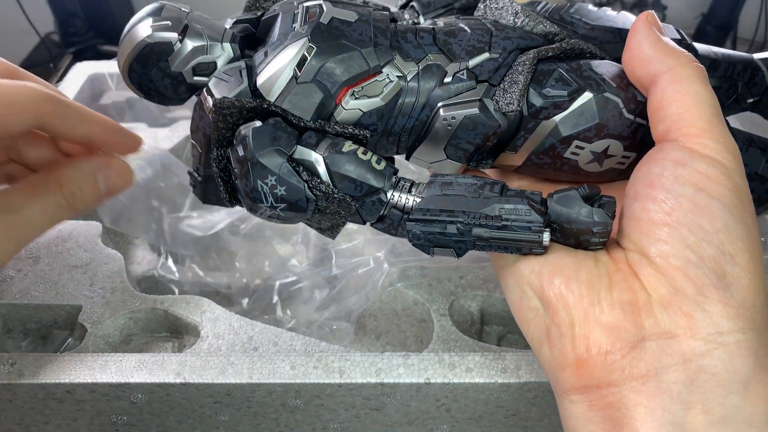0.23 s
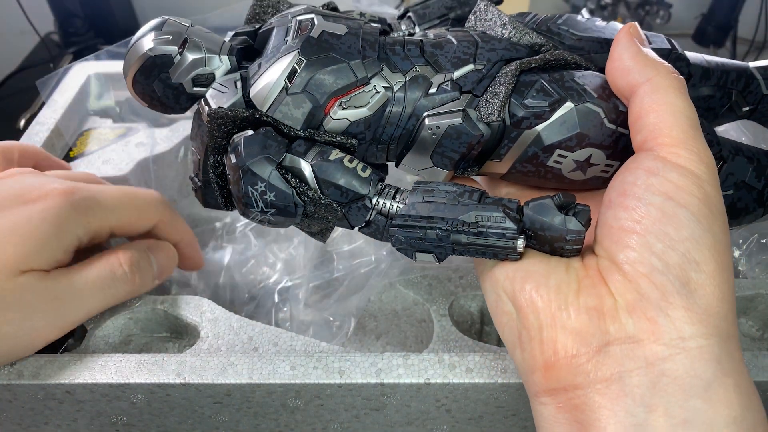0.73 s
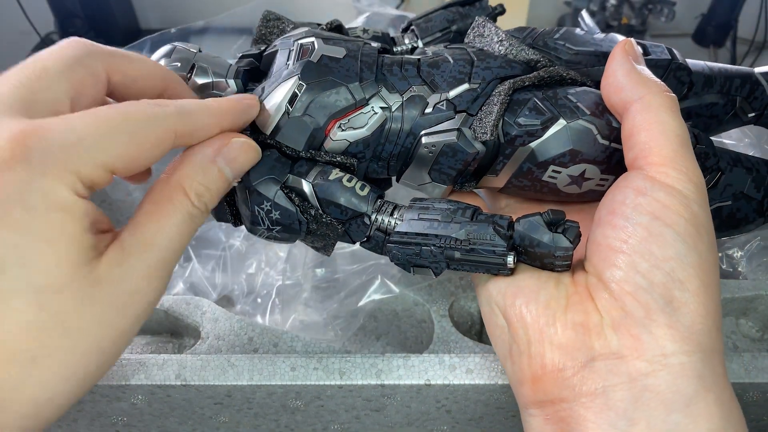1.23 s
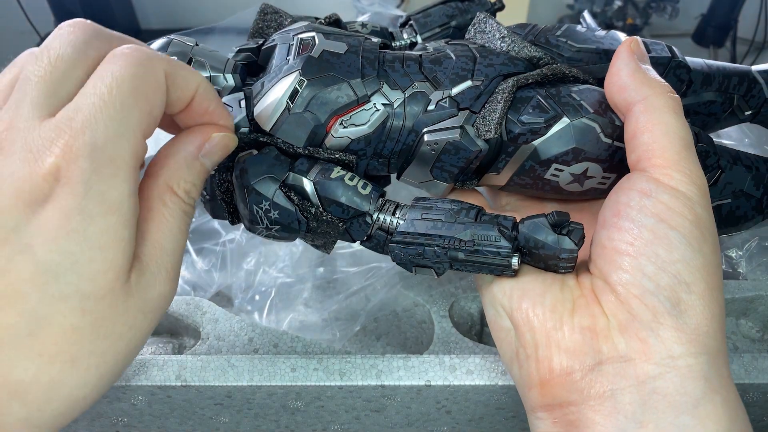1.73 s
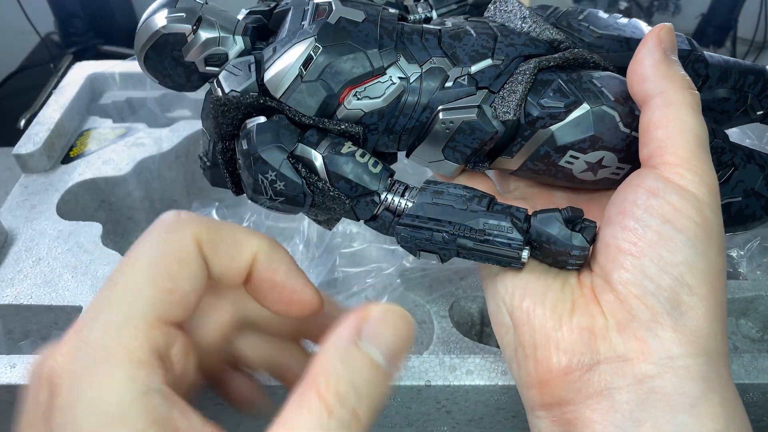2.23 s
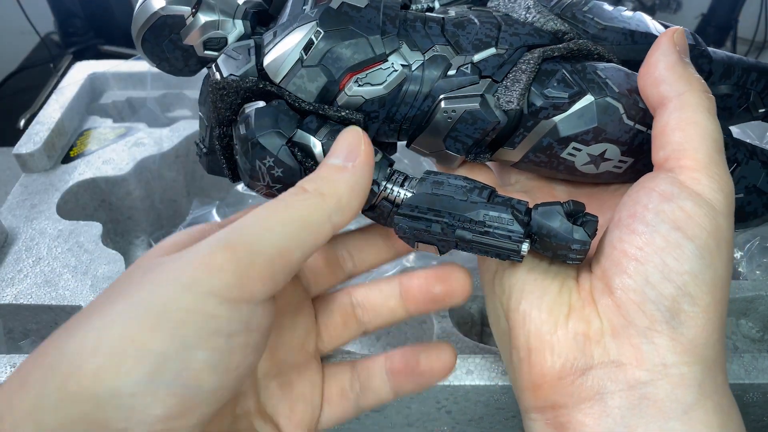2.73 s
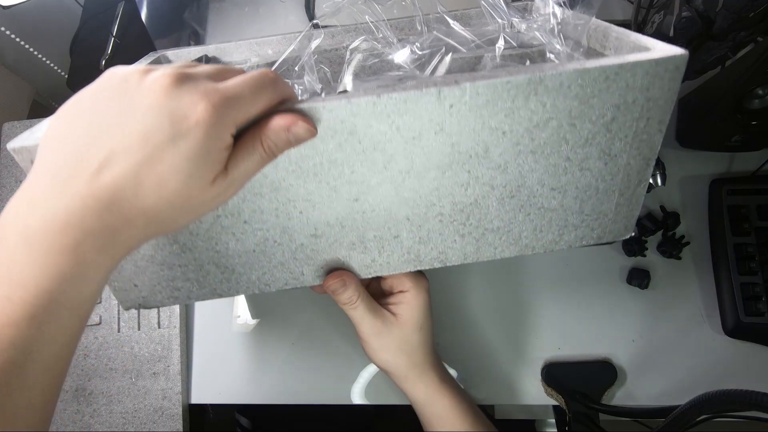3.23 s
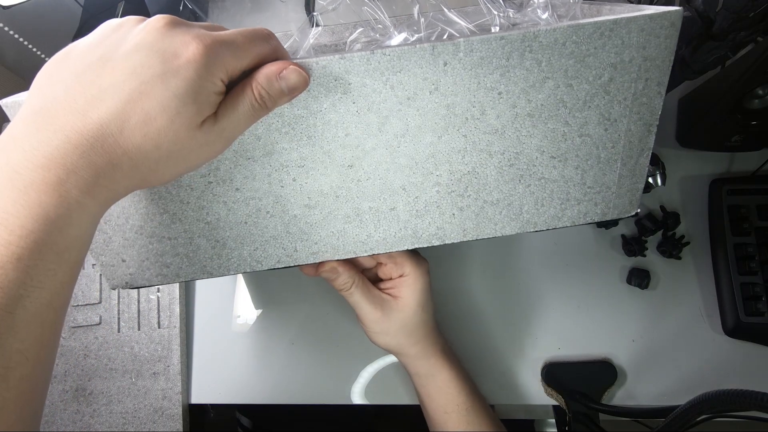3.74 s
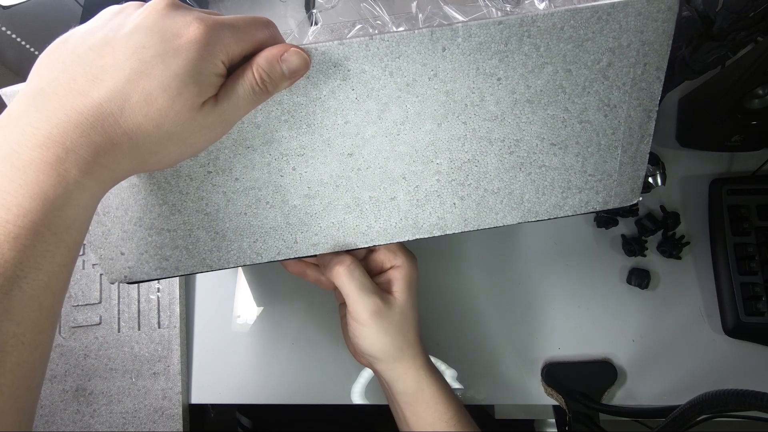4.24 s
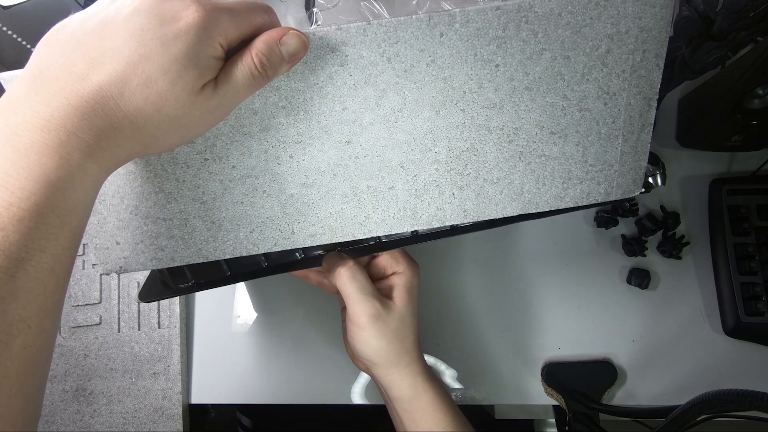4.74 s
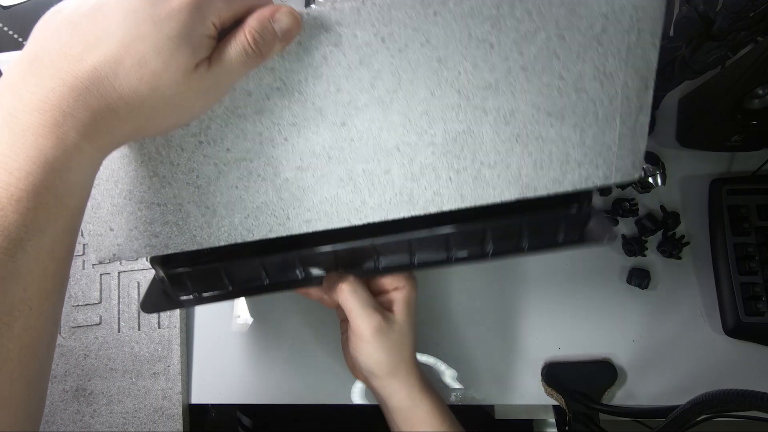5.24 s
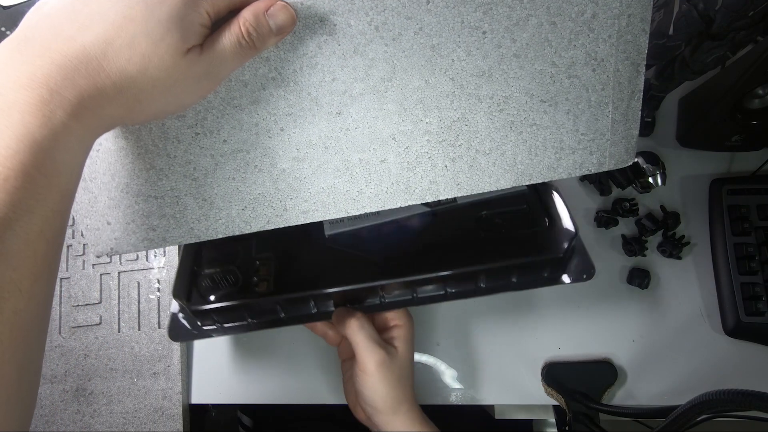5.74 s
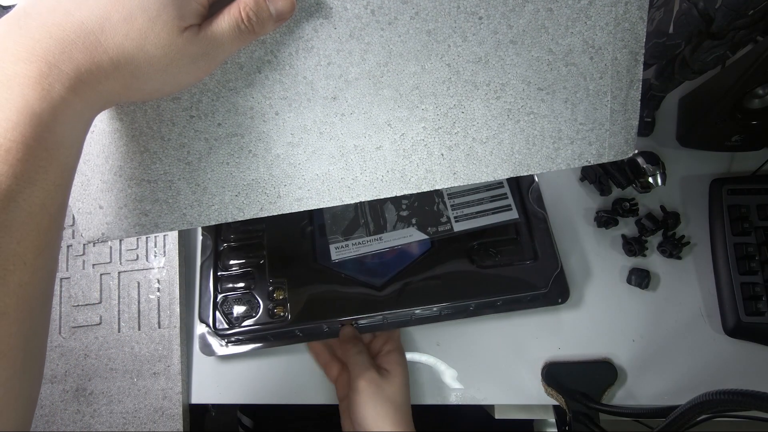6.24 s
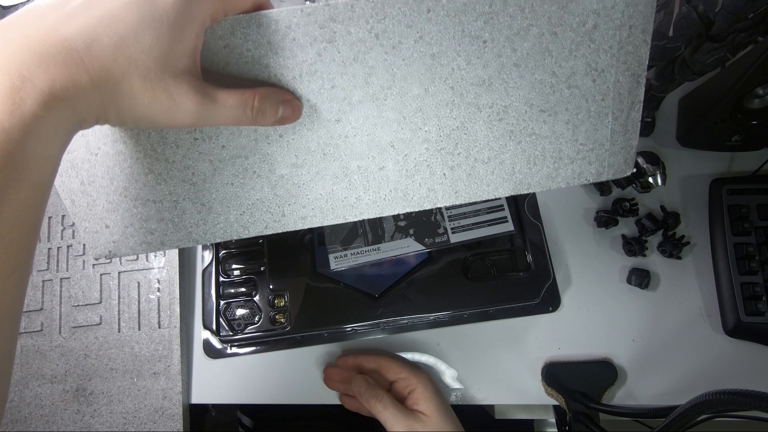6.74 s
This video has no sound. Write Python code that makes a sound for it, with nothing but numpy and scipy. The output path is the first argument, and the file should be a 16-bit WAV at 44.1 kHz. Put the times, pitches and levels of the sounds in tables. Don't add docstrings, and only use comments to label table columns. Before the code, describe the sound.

A quiet small room, faint fan noise, one near microphone, very short reverberation. From 0 to 0.7 s thin plastic film crinkles lightly with tiny crisp snaps; then it is nearly silent, with a few small crackles around 1.2 and 1.85 s. At 2.35-2.8 s a soft airy rustle swells. At 2.95 s a foam box is lifted with dull low bumps, followed by faint ticks and brushing until 3.75 s. From 3.85 to 5 s a plastic tray is dragged along foam: jerky start, then rough, dry, gritty scraping, strongest near 4.4 s. At 5.08-5.2 s it knocks free with hollow clunks. Quiet rubbing follows, with a quick arching squeak at 5.6 s and a small scuff at 6.0 s. At 6.28 s the tray hits the desk, the loudest event, a hollow clattering slap with rapid bounces. At 6.67-6.75 s comes a foam thump and a sharp, bright plastic rap, then quiet.

```python
import sys
import numpy as np
from scipy import signal
from scipy.io import wavfile
from scipy.ndimage import uniform_filter1d

SR = 44100
rng = np.random.default_rng(int(sys.argv[2]) if len(sys.argv) > 2 else 0)


def magnitude_from_level(level_db):
    exponent = np.asarray(level_db, float) / 20
    return 10 ** exponent


def output_pcm(signal):
    pcm = np.clip(np.atleast_2d(signal).T, -1, 1) * 32767
    wavfile.write(sys.argv[1], SR, np.round(pcm).astype(np.int16))


N = 308920


def evened(x):
    return x / np.sqrt(np.mean(x ** 2) + 1e-20)


def read(points, hz):
    f, value = np.transpose(points)
    return np.interp(np.log(hz + 1), np.log(f + 1), value)


def add(mix, start_s, sound):
    part = mix[max(round(start_s * SR), 0):][:len(sound)]
    part += sound[:len(part)]


def band(x, order, edges_hz, kind):
    return signal.sosfilt(signal.butter(order, edges_hz, kind, fs=SR, output="sos"), x)


def resonate(x, hz, width):
    turn = np.exp(2j * np.pi * np.cumsum(hz * np.ones(len(x))) / SR)
    r = np.exp(-np.pi * width / SR)
    return 2 * (turn * signal.lfilter([1 - r], [1, -r], x / turn + 1e-18)).real


def coloured(x, spectrum, patchy_db, size):
    hz, t, z = signal.stft(x, SR, nperseg=size, noverlap=size * 3 // 4)
    patches = uniform_filter1d(rng.standard_normal(z.T.shape), 12, 0)
    patches = evened(uniform_filter1d(patches, 3, 1)).T
    z = z * magnitude_from_level(read(spectrum, hz)[:, None] + patchy_db * patches)
    return evened(signal.istft(z, SR, nperseg=size, noverlap=size * 3 // 4)[1][:N])


def ringing(modes, longest):
    t = np.arange(int(.4 * SR)) / SR
    ring = sum(magnitude_from_level(db - 60 * t / min(t60, longest)) * np.sin(2 * np.pi * hz * t) for hz, db, t60 in modes)
    return ring / abs(ring).max()


def air():
    # freq_hz, level_db [dB per Hz]
    air_spectrum = [(15, -33.5), (25, 8), (76, -0.5), (167, -9), (266, -8.5), (538, -12), (927, -1.5),
                    (1120, -45.5), (1220, -8.5), (2270, -37), (2460, -30), (2900, -20.5), (4130, -37.5),
                    (4600, -65.5), (16500, -35.5)]
    # centre_hz, width_hz, level_db
    fan = [(100, 9.5, -74.5), (293, 67, -68), (915, 28, -76)]
    hum = sum(magnitude_from_level(db) * evened(resonate(rng.standard_normal(N), hz, width)) for hz, width, db in fan)
    tone = coloured(rng.standard_normal(N), air_spectrum, patchy_db=2.5, size=2048)
    return magnitude_from_level(-69.5) * band(tone, 6, 10500, "low") + hum


def walls():
    # freq_hz, t60_s
    room = [(100, 0.15), (500, 0.18), (2000, 0.086), (8000, 0.1), (16000, 0.19)]
    taps = np.zeros(SR // 2)
    at = np.arange(120, len(taps) - 20, 20)
    taps[at + rng.integers(0, 20, len(at))] = rng.choice([-1., 1.], len(at))
    hz, t, z = signal.stft(taps, SR, nperseg=256)
    tail = signal.istft(z * magnitude_from_level(-60 * t / read(room, hz)[:, None]), SR, nperseg=256)[1]
    return tail / np.linalg.norm(tail)


def bump(db, hz, t60):
    t = np.arange(int(.2 * SR)) / SR
    fade = magnitude_from_level(-60 * t / max(t60, .02)) * np.minimum(t / 0.0018, 1)
    chatter = resonate(resonate(rng.standard_normal(len(t)), hz, width=.5 * hz), hz, width=.5 * hz)
    ring = fade * (evened(chatter) + 1.58 * np.sin(2 * np.pi * hz * t))
    return magnitude_from_level(db - 4.5) * ring / abs(ring).max()


def soft_contacts():
    # start_s, peak_db, centre_hz,
    # t60_s
    contacts = [
        (4.03, -35, 100, 0.081),
        (6.278, -22, 65, 0.1),
        (6.739, -31, 108.3, 0.35),
                (2.929, -38, 295, 0.019), (2.961, -37, 115, 0.21), (2.999, -29, 401, 0.039),
             (3.149, -49, 398, 0.1), (3.19, -40.5, 360, 0.067), (3.285, -43, 1027, 0.065),
             (3.318, -37.5, 390, 0.019), (3.842, -27.5, 616, 0.16), (3.855, -26.5, 700, 0.16),
             (4.017, -26, 100, 0.057), (5.038, -27, 144, 0.049), (5.075, -29, 108, 0.42),
             (5.097, -23.5, 532, 0.19), (5.124, -21, 673, 0.066), (5.164, -23, 113, 0.036),
             (5.744, -41.5, 322, 0.063), (5.993, -33, 915, 0.1), (6.068, -33, 474, 0.069),
             (6.2795, -14, 340, 0.05), (6.671, -17, 230, 0.026), (6.703, -24, 417, 0.19),
             (6.74, -22.5, 410, 0.2),
                (5.078, -25, 902, 0.058),
        (5.108, -21, 1200, .05),
        (5.138, -33, 800, 0.043),
        (5.175, -27.5, 1010, 0.036),
        (6.275, -8.5, 1076, 0.031),
        (6.3, -15, 657.5, 0.14),
        (3.475, -42.5, 440, 0.042),
        (3.551, -48, 443, 0.051),
        (4.16, -30.5, 402, .2),
                (5.5835, -18.5, 2000, .02),
        (5.589, -24, 2300, 0.022),
        (2.963, -35, 280, 0.093),
        (3.005, -35, 247, 0.049),
        (6.69, -27.5, 480, .3),
        (6.682, -27.5, 105, .15),
    ]
    mix = np.zeros(N)
    for s, *rest in contacts:
        add(mix, s, bump(*rest))
    return mix


def tray():
    # start_s, blow_db, contact_ms
    blows = [
        (6.26, -30, 1.2),
        (6.273, -20, .6),
        (6.2793, 0, 1.2),
        (6.2917, -1, 1.1),
        (6.3005, -6, 1.4),
        (6.318, -19, .7),
        (6.334, -16, .7),
    ]
    # freq_hz, level_db, t60_s
    tray_modes = [(120, -43.5, 0.12), (188.7, -14.5, 0.15), (222.5, -10.5, 0.18), (299, -3, 0.14),
                  (364, 8.5, 0.04), (414.2, 5.5, 0.17), (460, 6.5, 0.03), (474, 6, 0.12), (525, -4, 0.06),
                  (660, -5, 0.18), (700, -7, 0.08), (855, 1, 0.11), (826, -2, 0.12), (1020, -8, 0.17),
                  (1180, -24.5, 0.08), (1300, -24.5, .07), (1500, -9.5, 0.06)]
    force = np.zeros(N)
    for s, db, ms in blows:
        push = np.sin(np.pi * np.clip(np.arange(200) / (ms * SR / 1000), 0, 1))
        add(force, s, magnitude_from_level(db) * push / push.sum())
    ring = signal.oaconvolve(force, ringing(tray_modes, longest=.17))[:N]
    return magnitude_from_level(1.5) * band(ring, 2, 200, "high")


def raps():
    # start_s, blow_db
    rap_blows = [
        (6.284, -27),
        (6.7408, -11.5),
        (6.7437, -10.5),
        (6.7465, -6.5),
        (6.7492, -9.5),
        (6.753, -22.5),
    ]
    # freq_hz, level_db, t60_s
    plastic = [(1200, -14, 0.04), (1880, -17, 0.04), (2140, -3, .04), (2500, 8, 0.03), (2894, -0.5, 0.045),
               (3220, 5.5, 0.027), (3220, -13, 0.03), (4285, -9.5, 0.04), (4900, -6.5, 0.036),
               (5990, -9, 0.03), (6400, -9, 0.031), (7170, -6, 0.037), (8300, -15.5, .03)]
    force, t = np.zeros(N), np.arange(600) / SR
    for s, db in rap_blows:
        add(force, s, magnitude_from_level(db - 10.0 - 60 * t / 0.0071) * rng.standard_normal(len(t)))
    crack = band(force, 2, [1500, 8500], "band")
    ring = signal.oaconvolve(force, ringing(plastic, longest=.05))[:N]
    return .5 * ring + 2.04 * crack


def snap(db, hz, treble_db, top_hz):
    t = np.arange(int(.06 * SR)) / SR
    burst = rng.standard_normal(len(t)) * (magnitude_from_level(-60 * t / .006) + magnitude_from_level(-10 - 60 * t / .045))
    broad = resonate(resonate(burst, hz, width=1.4 * hz), hz, width=1.4 * hz)
    body = broad + 4.9 * resonate(burst, hz, width=0.18 * hz)
    edge = band(burst, 1, [6500, top_hz], "band")
    body = band(body, 2, [700, 12000], "band")
    return magnitude_from_level(db - 0.5) * (body / abs(body).max() + magnitude_from_level(treble_db) * edge / abs(edge).max())


def clicks():
    # start_s, peak_db, centre_hz
    snaps = [(0.02, -44.5, 3460), (0.0513, -48, 3470), (0.0554, -29.5, 3660), (0.079, -35, 6800),
             (0.0985, -40.5, 3560), (0.1531, -57, 4000), (0.186, -63, 4000), (0.2127, -43, 7700),
             (0.2682, -35, 7950), (0.2847, -41, 1540), (0.3327, -41, 1550), (0.305, -44, 1520),
             (0.3406, -40, 2900), (0.3553, -38, 2860), (0.374, -46, 3000), (0.4212, -40.5, 4730),
             (0.4394, -47, 1730), (0.4564, -44, 1700), (0.5257, -50, 1480), (0.5766, -47, 1650),
             (0.5925, -42, 6160), (0.618, -33, 2960), (0.6495, -41, 2860), (0.6594, -39, 4500),
             (1.1387, -55, 4940), (1.1467, -41.5, 4900), (1.1945, -44, 7900), (1.2057, -44, 5160),
             (1.2236, -46, 5270), (1.3655, -46.5, 5170), (1.475, -62, 4000), (1.734, -55, 1640),
             (1.8295, -40.5, 5440), (1.8658, -28, 4740), (1.8791, -37.5, 1360), (2.1802, -53.5, 8850),
             (2.1984, -61, 8770)]
    grit = [
        (4.48, -22, 1930),
        (4.587, -23, 1180),
        (4.608, -24, 1950),
        (4.66, -21.5, 1880),
        (4.694, -24, 1200),
        (4.874, -23.5, 1080),
        (4.912, -25, 1200),
        (4.934, -26, 1760),
    ]
    ticks = [(2.363, -42.5, 1590), (2.4448, -37.5, 1570), (2.9307, -52, 3530), (2.9612, -31.5, 1970),
             (3.0004, -32, 1500), (3.136, -49.5, 700), (3.144, -44, 1420), (3.179, -42, 870),
             (3.201, -46, 1130), (3.266, -50, 1210), (3.2875, -56, 1310), (3.3, -44, 1200),
             (3.3617, -46, 2700), (3.434, -47, 1080), (3.475, -47, 1020), (3.516, -44.5, 1130),
             (3.5757, -39, 1430), (3.606, -36, 2660), (3.6799, -38, 1410), (3.9408, -26, 2450),
             (3.9518, -27, 1170), (4.1542, -29.5, 2800), (4.2782, -30, 1720), (5.0689, -26, 2800),
             (5.094, -21, 2320), (5.1035, -18, 1880), (5.161, -26, 2200), (5.779, -52, 1260),
             (5.8067, -43.5, 2600), (5.863, -47, 2780), (5.907, -55, 2500), (6.2661, -32.5, 3500),
             (6.481, -41, 3420), (6.503, -42, 2200), (6.552, -43, 2230), (6.67, -39, 2530)]
    cracks = [(6.2741, -26, 9200), (6.2833, -25, 6000), (.903, -57, 7000), (1.155, -55, 5000),
              (1.322, -58, 5000), (1.424, -66, 9000), (1.745, -54, 7000), (2.084, -62, 9000),
              (2.305, -59, 9000), (3.222, -50, 3500), (3.243, -54, 4000), (3.454, -50, 4500),
              (3.888, -40, 2500), (4.337, -30, 1980), (2.926, -53, 1090), (5.92, -49, 1200),
              (6.565, -44, 6040)]
    mix = np.zeros(N)
    for rows, treble_db, top_hz in ((snaps, -1.5, 9500), (grit, -16, 9500), (ticks, -4, 15500)):
        for s, db, hz in rows:
            dulled_db = treble_db - 0.57 * (db + 47.5)
            add(mix, s, snap(db, hz, dulled_db, top_hz))
    for s, db, hz in cracks:
        add(mix, s, snap(db, hz, treble_db=-5.5, top_hz=15400))
    return mix


def singing_rubs():
    # middle_s, length_s, level_db [rms], centre_hz
    rubs = [(0.063, 0.035, -46, 3570), (0.306, 0.039, -53.5, 1500), (0.354, .04, -58, 1400),
            (2.936, 0.011, -54, 3500), (3.212, 0.037, -53, 1150), (3.32, 0.049, -55.5, 880),
            (4.225, .05, -40, 400), (4.292, 0.041, -41.5, 1000), (4.399, 0.045, -36.5, 1240),
            (4.413, 0.021, -38, 2250), (4.445, .06, -36, 2170), (4.484, 0.032, -36.5, 2100),
            (4.52, 0.036, -43, 2720), (4.699, 0.031, -31, 300), (4.761, .05, -37, 2200),
            (4.772, 0.032, -32.5, 376), (4.852, 0.048, -41, 2000), (4.945, 0.039, -36.5, 329),
            (4.96, 0.085, -38, 1800), (5.001, 0.051, -38, 1810), (5.748, 0.038, -56.5, 2800),
            (5.955, 0.059, -52, 724), (5.943, .06, -56, 2500), (6.004, 0.034, -40.5, 2380),
            (6.015, 0.028, -46, 1390), (6.206, .03, -58, 1010), (6.217, 0.023, -41, 2700),
            (6.247, .03, -45, 258), (3.857, 0.044, -36.5, 1150), (3.922, .04, -41.5, 404),
            (4.001, 0.065, -46, 420), (6.52, 0.078, -58, 150), (5.105, .04, -49, 12500),
            (6.755, .04, -38, 1300), (6.76, .05, -38.5, 1000), (6.72, .015, -51, 8700),
            (6.675, .015, -51.5, 8500), (3.03, .09, -61, 13000), (5.63, .09, -51, 13000),
            (6.513, 0.028, -60, 2200), (6.555, .05, -55, 3900), (6.678, 0.033, -46, 1600),
            (6.685, .04, -50.5, 1086), (6.675, 0.016, -49, 3200)]
    mix = np.zeros(N)
    for middle, length, db, hz in rubs:
        slip = rng.standard_normal(int(.1 * SR)) ** 3
        rub = resonate(resonate(slip, hz, width=0.24 * hz), hz, width=.3 * hz)
        rub = evened(rub)[:int(length * SR)]
        add(mix, middle - length / 2, magnitude_from_level(db) * rub * np.hanning(len(rub)) ** 0.93)
    return mix


def squeak(rows):
    s, hz, db = np.transpose(rows)
    t = np.arange(s[0], s[-1], 1 / SR)
    shake = uniform_filter1d(rng.standard_normal((int(.2 * SR), 2)), 70, 0)
    shake = evened(shake)[:len(t)].T
    turns = np.cumsum(np.interp(t, s, hz) * (1 + 0.018 * shake[0])) / SR
    tone = np.sin(2 * np.pi * turns) + magnitude_from_level(-12) * np.sin(4 * np.pi * turns)
    level = magnitude_from_level(np.interp(t, s, db) - 4.5 + 1.67 * shake[1])
    return level * tone * signal.windows.tukey(len(t), .15)


def squeaks():
    # time_s, slip_rate_hz, level_db
    squeak_curves = [
        [(5.43, 2300, -62), (5.445, 3300, -52), (5.46, 4050, -49), (5.47, 3050, -45), (5.48, 2000, -52),
         (5.492, 1140, -58)],
        [(5.586, 2100, -36), (5.5955, 2950, -20), (5.601, 3400, -27), (5.613, 4250, -34), (5.625, 4800, -34),
         (5.637, 4550, -37), (5.649, 3900, -36), (5.659, 2950, -35), (5.675, 1700, -52)],
        [(5.0855, 10300, -34), (5.096, 15500, -42)],
        [(5.265, 2950, -47), (5.295, 2880, -64)],
        [(6.545, 1900, -52), (6.555, 2150, -44), (6.572, 2200, -50), (6.592, 2050, -60)],
        [(5.569, 3070, -46), (5.582, 3050, -48)],
    ]
    mix = np.zeros(N)
    for rows in squeak_curves:
        add(mix, rows[0][0], squeak(rows))
    return mix


def slips(per_s, spread_db, clump_db, clump_s):
    size = magnitude_from_level(spread_db * np.minimum(rng.exponential(1, N), 4)) * rng.choice([-1., 1.], N)
    clumps = evened(uniform_filter1d(rng.standard_normal(N), max(int(clump_s * SR), 1)))
    return size * (rng.random(N) < per_s / SR) * magnitude_from_level(clump_db * clumps)


def stroked(rows):
    t, power = np.arange(0, N + 64, 32) / SR, 0
    for s, db, rise, fall in rows:
        away = np.where(t < s, (s - t) / max(rise, .002), (t - s) / max(fall, .002))
        power = power + magnitude_from_level(db - 20 * away ** 1.676) ** 2
    return np.interp(np.arange(N) / SR, t, power)


def rubbing():
    film_strokes = [(.06, -58.5, 0.05, 0.12), (.15, -62.5, 0.0054, 0.12), (.215, -54.5, 0.021, 0.075),
                    (.29, -52, 0.022, 0.15), (.385, -54.5, 0.1, 0.024), (.44, -58, 0.033, 0.08),
                    (.55, -66.5, 0.027, 0.065), (.61, -55, 0.045, 0.088), (.69, -56.5, 0.047, 0.052),
                    (.9, -71, 0.081, 0.22), (1.16, -65, 0, 0.14), (1.5, -72.5, 0.81, 0.9),
                    (1.62, -80, 0.19, .25), (1.835, -58, 0, 0.092), (1.88, -56, 0, 0.052),
                    (2.2, -61, 0, 0.012), (2.367, -52, 0, 0.046), (2.45, -46, 0.073, 0.15),
                    (2.618, -43.5, 0.011, 0.12), (2.71, -45, 0.057, 0.1), (2.78, -56, 0.3, 0.13),
                    (5.63, -42, 0.059, 0.1), (6.665, -49.5, 0.043, 0.072), (6.72, -44.5, 0.042, 0.035),
                    (6.748, -30, 0.015, 0.026)]
    lifts = [(2.929, -50, 0.0038, 0.028), (3.0, -50.5, 0.055, 0.092), (3.2, -63, 0.3, .5),
             (3.14, -55.5, 0.068, 0.051), (3.21, -61.5, 0.086, 0.037), (3.48, -73, .03, 0.024),
             (3.3, -53, 0.04, 0.049), (3.44, -56, 0.0085, 0.042), (3.58, -48, 0.0067, 0.028),
             (3.608, -53, .005, 0.043), (3.685, -48.5, 0.016, 0.14), (3.735, -46, 0.08, 0.084)]
    pulls = [(3.99, -33, 0.071, 0.047), (4.08, -36.5, 0.15, 0.078), (4.16, -37, 0.009, 0.12),
             (4.225, -32, 0.072, 0.032), (4.285, -29.5, 0.01, 0.075), (4.385, -25.5, 0.089, 0.056),
             (4.412, -34, 0.05, 0.022), (4.49, -34, 0.16, 0.055), (4.62, -31, 0.33, 0.36),
             (4.765, -32.5, 0.14, 0.12), (4.92, -38.5, 0.42, 0.31), (5.05, -63, 0.016, 0.035)]
    jerks = [
        (3.85, -30.5, 0.024, 0.05),
        (3.9, -38, .04, 0.034),
        (3.945, -24, 0.0069, 0.012),
        (5.08, -31.5, 0.015, 0.069),
        (5.17, -30.5, 0.071, 0.049),
        (6.216, -35, 0.019, 0.048),
        (6.285, -21.5, 0.022, 0.073),
        (6.34, -35.5, 0.058, 0.071),
    ]
    settling = [(5.28, -50.5, 0.039, 0.032), (5.37, -47.5, 0.032, 0.027), (5.45, -53, 0.18, 0.13),
                (5.54, -48.5, 0.07, 0.079), (5.75, -54, 0.033, 0.058), (5.95, -50.5, 0.1, 0.049),
                (6.005, -39.5, 0.054, 0.054), (6.1, -55.5, 0.17, 0.35), (6.49, -56.5, 0.083, 0.051),
                (6.56, -52, 0.07, 0.061), (6.765, -29, 0.013, 0.067), (6.81, -45, .04, 0.07)]
    heaves = [(2.98, -51.5, 0.07, 0.08), (3.2, -61, 0.089, 0.36), (4.02, -50.5, 0.056, 0.16),
              (4.28, -76, .06, 0.045), (4.66, -41, 0.26, 0.24), (4.92, -45.5, 0.4, 0.17),
              (5.132, -42, 0.12, 0.071), (5.78, -71.5, 0.51, 0.81), (6.275, -39.5, 0.022, 0.15),
              (6.5, -85.5, 0.11, 0.1), (6.676, -47, 0.016, 0.19), (6.79, -69.5, 0.064, 0.068)]
    scrape = [(410, -56.5), (700, -9.5), (801, -9), (1050, -1), (1390, 2.5), (2270, 0), (2470, 0),
              (2750, 2.5), (7000, -7.5), (9100, -25.5), (16000, -41.5)]
    fizz = [(2650, -13), (4500, -2), (6410, -6), (8410, -4.5), (11500, -9), (13300, -14.5), (15400, -12.5),
            (16500, -33)]
    hollow_box = [(82, -76), (140, -1.5), (210, -1), (340, 4), (432, -3.5), (469, -1), (801, -5.5),
                  (1000, -4), (1300, -9), (2200, -120)]
    thump = [(15, -59.5), (40, -18.5), (75, -33), (102, -1), (182, 3), (200, -3), (260, -35.5), (440, -120)]
    # time_s, freq_hz
    patch = [(0.0, 3500), (0.35, 1810), (0.74, 3240), (0.88, 1120), (1.64, 1090), (1.73, 2916),
             (1.99, 2680), (2.14, 941), (2.28, 2020), (2.71, 3320), (3.16, 1320), (5.05, 1780),
             (5.75, 3000), (6.08, 1017), (6.51, 990), (6.56, 2200), (6.68, 1500), (7.0, 2330)]
    # centre_hz, width_hz, level_db
    grain = [(1090, 300, -9), (1985, 150, -17), (2295, 210, -16)]

    heave, rest = stroked(heaves), magnitude_from_level(-76) ** 2
    level, crisp, hollow = rest, rest * magnitude_from_level(-38.0), heave * magnitude_from_level(3.5) ** 2
    for rows, crisp_db, hollow_db in ((film_strokes, -1.03, -47), (lifts, -3.4, -10.5), (pulls, -11.5, -14),
                                      (jerks, -22.5, -21), (settling, -8, -11.5)):
        power = stroked(rows)
        level = level + power
        crisp = crisp + power * magnitude_from_level(crisp_db) ** 2
        hollow = hollow + power * magnitude_from_level(hollow_db) ** 2

    drive = slips(per_s=9000, spread_db=2.0, clump_db=2.0, clump_s=0.004)
    face = coloured(drive, scrape, patchy_db=2.3, size=512)
    patch_s, patch_hz = np.transpose(patch)
    moving_hz = np.clip(np.interp(np.arange(N) / SR, patch_s, patch_hz), 500, 6000)
    face = evened(face + 13.0 * resonate(face, moving_hz, width=2650))
    face = evened(face + sum(magnitude_from_level(db) * evened(resonate(face, hz, width)) for hz, width, db in grain))
    film = coloured(drive, fizz, patchy_db=3.2, size=256)
    coarse = slips(per_s=2500, spread_db=1.0, clump_db=1.54, clump_s=0.017)
    box = coloured(coarse, hollow_box, patchy_db=3, size=1024)
    hand = coloured(rng.standard_normal(N), thump, patchy_db=7.0, size=2048)
    surface = magnitude_from_level(-5.5) * np.sqrt(level) * face + magnitude_from_level(-2.0) * np.sqrt(crisp) * film
    return surface + np.sqrt(hollow) * box + np.sqrt(heave) * hand


def scene():
    hits = tray() + raps() + soft_contacts() + clicks()
    squeaking = squeaks()
    rub = rubbing() + singing_rubs()
    to_walls = magnitude_from_level(-2.5) * hits + magnitude_from_level(-0.5) * squeaking + magnitude_from_level(-11.5) * rub
    wet = signal.fftconvolve(to_walls, walls())[:N]
    return (hits + squeaking + rub + wet + air())[None]


def top_cut(x):
    return signal.sosfilt(signal.butter(12, 17170, fs=SR, output="sos"), x)


def record(dry):
    thin = band(dry, 2, 36, "high")
    top = signal.sosfiltfilt(signal.butter(8, 12100, "high", fs=SR, output="sos"), thin)
    top_db = 10 * np.log10(abs(uniform_filter1d(top ** 2, size=1500)) + 1e-14)
    shut = uniform_filter1d(1. * (top_db < -87.5), size=600)
    thin = thin - (1 - magnitude_from_level(-22)) * shut * top
    limited = signal.oaconvolve(thin, signal.firwin(255, 16300, fs=SR)[None], "same")
    return top_cut(limited)


dry = scene()
out = record(dry)
output_pcm(out)
```